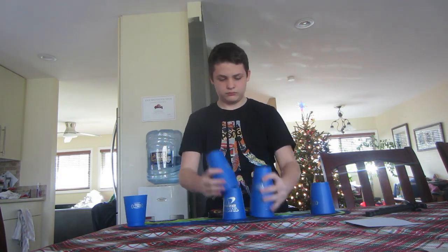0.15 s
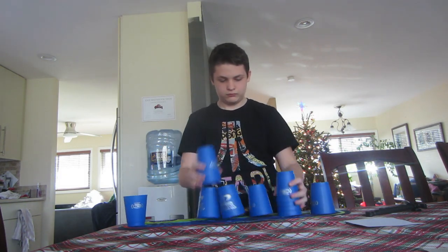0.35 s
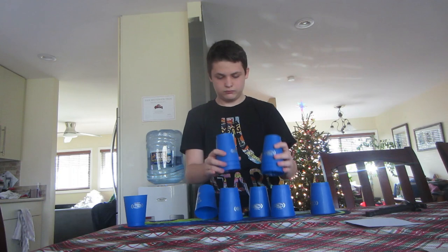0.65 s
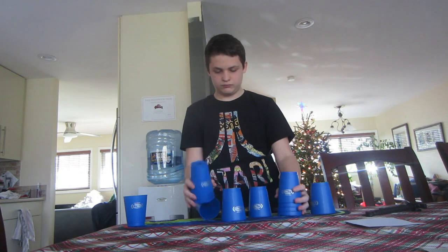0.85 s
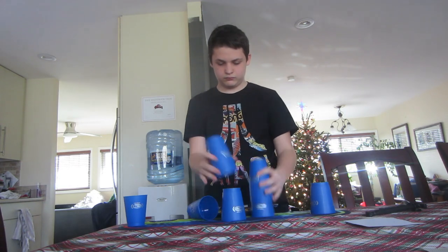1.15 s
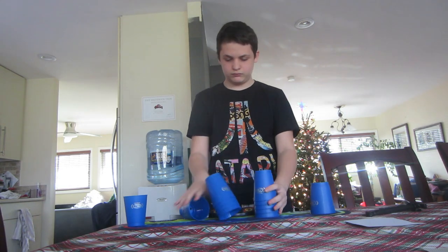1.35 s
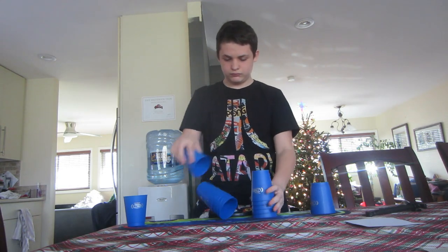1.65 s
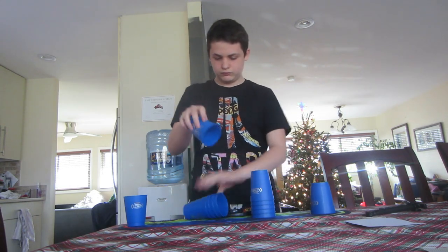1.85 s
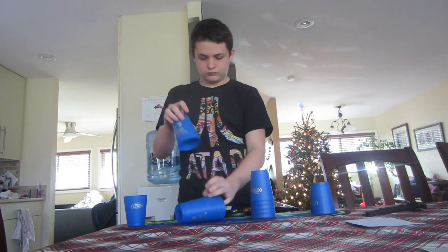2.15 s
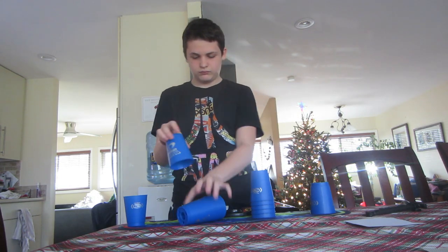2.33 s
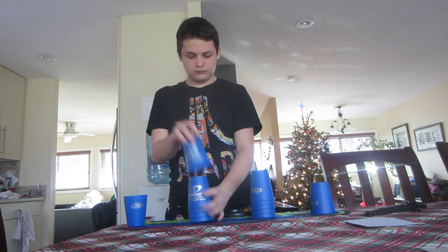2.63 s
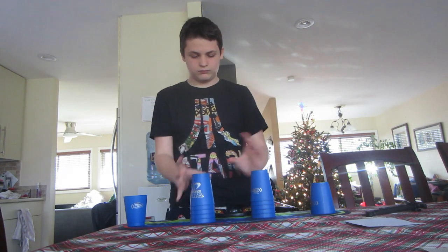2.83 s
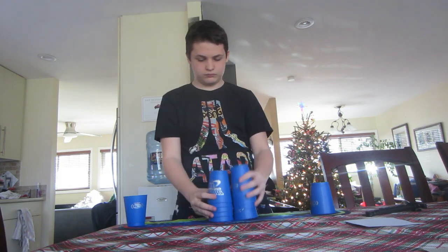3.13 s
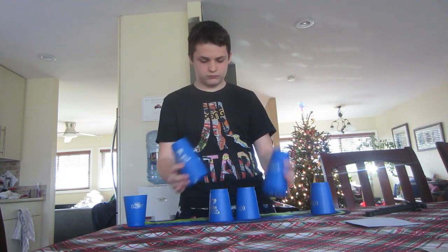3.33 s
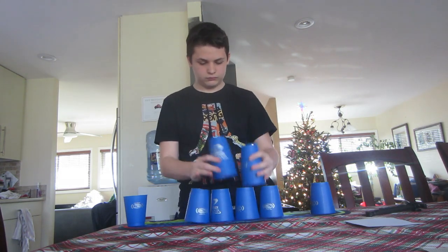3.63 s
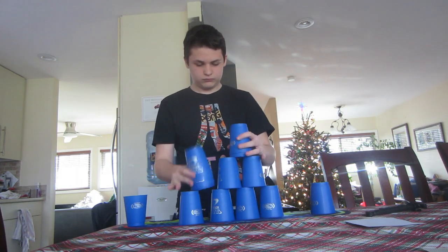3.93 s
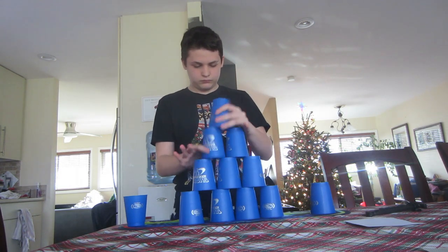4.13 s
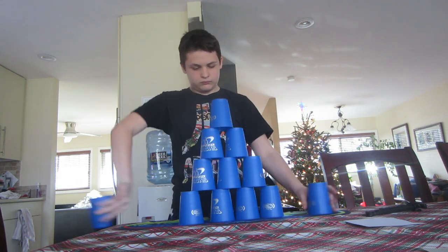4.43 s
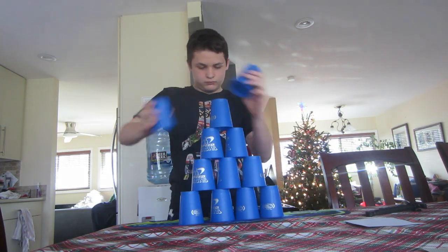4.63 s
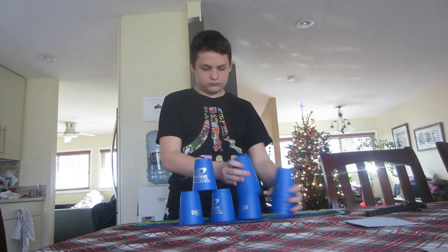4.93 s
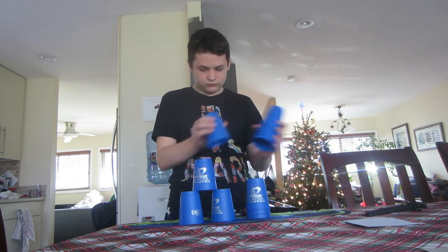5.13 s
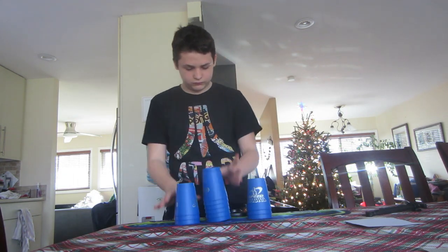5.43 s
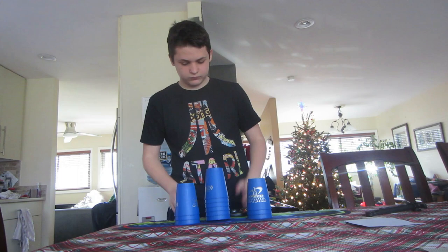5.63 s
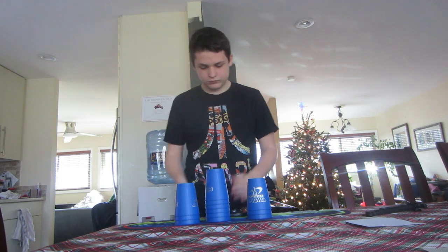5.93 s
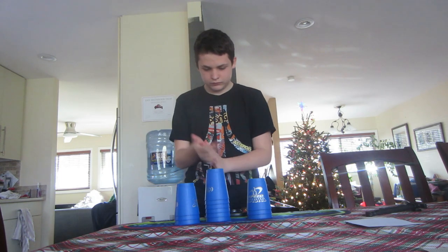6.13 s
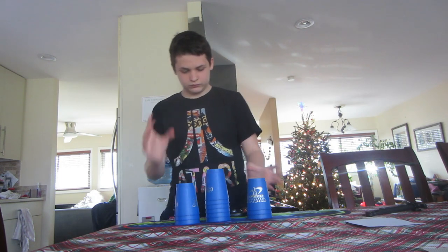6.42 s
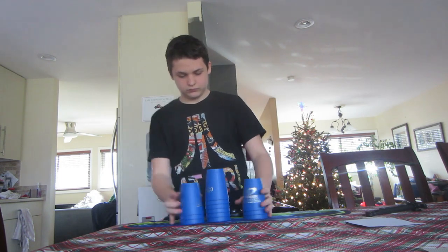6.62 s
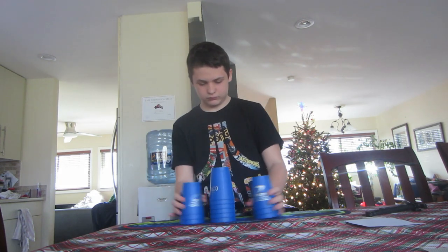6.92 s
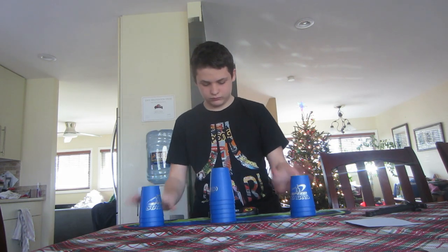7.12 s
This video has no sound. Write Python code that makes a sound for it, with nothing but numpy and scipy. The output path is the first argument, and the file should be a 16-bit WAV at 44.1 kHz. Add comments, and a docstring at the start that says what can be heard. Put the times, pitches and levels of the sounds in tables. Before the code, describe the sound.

Bright, dry plastic clacks with a hollow pop, irregular and fast, as cups nest and spread. A loud opening flurry thins to light taps, builds again through strong paired knocks, and ends in a rattling cascade. After a hushed gap, small taps and one firmer clack close it. Soft hand brushing, short room reverberation and a low steady hum surround everything.

```python
"""Hard plastic cups are stacked and unstacked fast on a mat on a table, in a lively room, one microphone.
Each knock is a click plus dying sines for the cup's wall, rim and trapped air, and a low thump of the table.
The room adds a few echoes and a tail of scattered taps that dies band by band.
Filtered noise makes the brushing of hands and cups and the room noise; wavering sines make a faint motor hum."""
import sys
import numpy as np
from scipy import signal
from scipy.fft import rfft, irfft
from scipy.io import wavfile
from scipy.ndimage import uniform_filter1d

SR = 44100
rng = np.random.default_rng(int(sys.argv[2]) if len(sys.argv) > 2 else 0)


def dump(signal):
    """Clip the signal to [-1, 1] and save it as 16-bit WAV at the path in sys.argv[1]."""
    limited = np.clip(np.atleast_2d(signal).T, -1, 1)
    pcm = np.round(limited * 32767).astype(np.int16)
    wavfile.write(sys.argv[1], SR, pcm)


N = 320594  # length in samples


def amp(db):
    """Turns decibels into a plain multiplier."""
    return 10 ** (np.asarray(db) / 20)


def evened(x):
    """Scales a signal to an average (RMS) strength of 1."""
    return x / np.sqrt(np.mean(x ** 2) + 1e-20)


def read(points, hz):
    """Reads a table of (pitch, value) at any pitch, with straight lines on a log pitch scale."""
    point_hz, value = np.transpose(points)
    return np.interp(np.log(hz + 1), np.log(point_hz + 1), value)


def add(mix, start_s, sound):
    """Adds a sound into the mix at a time, cut off where the mix ends."""
    part = mix[round(start_s * SR):][:len(sound)]
    part += sound[:len(part)]


def coloured(x, spectrum):
    """Filters by a spectrum given in dB."""
    gain = amp(read(spectrum, np.fft.rfftfreq(len(x), 1 / SR)))
    return irfft(rfft(x) * gain, len(x))


def waver(smoothed):
    """Turns smoothed noise into a level that drifts gently, by 0.77 dB RMS."""
    return amp(0.77 * evened(smoothed))


# Colour of the room noise before it is levelled: pitch_hz [Hz], level_db [dB per Hz]
AMBIENCE_COLOUR = [(20, 5.5), (60, -7), (140, -13), (180, -11), (230, -16.5), (390, -17), (540, -18.5),
                   (760, -21), (2700, -29.5), (3400, -35), (7000, -41.5), (11500, -69.5), (16000, -61.5)]
AMBIENCE_DB = -50.5  # RMS level
# Tones of the motor hum: pitch_hz [Hz], level_db [dB, peak before the waver]
HUM_TONES = [(60, -76.5), (176, -59.5), (240, -66), (468, -66.5), (540, -68)]


def background():
    """Steady room noise is filtered noise; the motor hum is a few sines that waver in level."""
    t = np.arange(N) / SR
    noise = amp(AMBIENCE_DB) * evened(coloured(rng.standard_normal(N), AMBIENCE_COLOUR))
    hum = np.zeros(N)
    for pitch_hz, level_db in HUM_TONES:
        slow = uniform_filter1d(uniform_filter1d(rng.standard_normal(N), 3000), 3000)
        hum += amp(level_db) * waver(slow) * np.sin(2 * np.pi * (pitch_hz * t + rng.random()))
    return noise + hum


# Hands on the cups, level over time: time_s [s], level_db [dB]
HAND_LEVEL = [(0, -72), (.85, -70), (1.2, -65.5), (1.7, -67), (2.3, -67.5), (2.5, -72), (2.7, -64.5),
              (3.02, -69), (3.3, -64), (4.25, -61), (4.5, -74), (5.3, -78), (5.7, -101), (6.1, -73),
              (6.68, -81), (6.74, -62.5), (7.27, -66)]
# Colour of the brushing before it is levelled: pitch_hz [Hz], level_db [dB per Hz]
BRUSH_COLOUR = [(200, -30), (700, -4), (2000, -2), (4000, -5), (7500, 0), (9500, -6), (11800, -28),
                (13200, -22), (16000, -30)]
# Cups sliding into or out of one another: start_s [s, full level reached], held_s [s], level_db [dB]
SLIDES = [(0.0, 0.029, -53.5), (.43, 0.081, -48), (.58, 0.027, -57), (3.14, 0.04, -58.5), (3.68, .01, -51),
          (3.89, .01, -63.5), (4.54, 0.022, -61.5), (5.03, 0.018, -57), (5.41, .01, -43.5),
          (6.88, 0.021, -58.5)]
SLIDE_RISE_DB_PER_S, SLIDE_FALL_DB_PER_S = 248, 195


def brushing():
    """Rubbing surfaces make soft grainy noise: hands throughout, and slides that swell, hold and die."""
    t = np.arange(N) / SR
    level = amp(np.interp(t, *np.transpose(HAND_LEVEL)))
    for start_s, held_s, level_db in SLIDES:
        rise_db = SLIDE_RISE_DB_PER_S * np.maximum(start_s - t, 0)
        fall_db = SLIDE_FALL_DB_PER_S * np.maximum(t - start_s - held_s, 0)
        level += amp(level_db - rise_db - fall_db)
    grain = waver(uniform_filter1d(rng.standard_normal(N), 250))
    return level * evened(coloured(rng.standard_normal(N), BRUSH_COLOUR) * grain)


PAIR_SPLIT = .015  # a cup is never quite round: each mode rings as a close pair, about this share apart


def ring(modes, t, rise_s, held_s, free_db, lean_db=0):
    """Dying sines, varied by the spot struck; contact damps most of the ring, the rest rings free; peak 1."""
    hz, level_db, t60_s = np.transpose(modes)[:, :, None]
    detune, luck, phase = rng.standard_normal((len(modes), 3)).T[:, :, None]
    spot_db, spot_detune = 2.5 * luck, .006 * detune
    damped = amp(lean_db + spot_db - 60 * t / held_s)  # falls 60 dB within held_s
    free = amp(free_db - 60 * t / t60_s)
    beat = np.cos(np.pi * PAIR_SPLIT * hz * (1 + luck / 3) * t) + .3
    sines = np.sin(2 * np.pi * hz * (1 + spot_detune) * t + 1.13 * phase)
    y = (amp(level_db) * (damped + free) * beat * sines).sum(0)
    y = y * (1 - np.exp(-t / rise_s)) ** 2  # soft start
    return y / abs(y).max()


def tick(scatter_s, size):
    """A click of even spectrum whose bands leave at scattered moments, as edges scrape into place."""
    luck = np.minimum(rng.exponential(1, size // 32 + 1), 3)
    late_s = np.repeat(luck ** 2 / 2 * scatter_s, 16)[:size // 2 + 1]  # 16 neighbours share a delay
    # Adding up the delays over pitch gives the phase that makes each band late
    spread = irfft(np.exp(-2j * np.pi * np.cumsum(late_s) * SR / size), size)
    return spread * (np.arange(size) < size // 4)


# The next three tables list ringing modes: pitch_hz [Hz], level_db [dB, relative],
# t60_s [s, time for the free ring to fall 60 dB]; each blow varies them a little
# The cup's wall
WALL_MODES = [(745, 0, .09), (828, 0, .1), (915, 0, .12), (1030, 0, .07), (1185, 0, .14), (1290, 0, .08),
              (1450, -2, .07), (1515, 0, .14), (1600, -2, .08), (1718, 0, .11)]
# Air under the upturned cup
AIR_MODES = [(370, -8, .03), (440, -1, .045), (495, 1, .04), (574, -1, .025), (650, -8, .02)]
# The cup's rim
RIM_MODES = [(2080, 0, .06), (2250, -1, .06), (2480, -1, .08), (2620, -6, .07), (2930, -11, .04),
             (3380, -13, .06)]
HELD_S = 0.014  # the hand and the contact damp most of a ring about this fast
AIR_SHIFT = .05  # the gap under the rim changes the pitch of the air by this share (RMS) from blow to blow


def distance(modes, favoured_hz):
    """How far each mode lies from the favoured pitch: 0 on it, 1 from 0.14 octave away."""
    octaves = abs(np.log2(np.array(modes)[:, :1] / favoured_hz))
    return np.minimum(octaves / .14, 1)


def knock(favoured_hz, others_db, air_db, rim_db, tick_db):
    """One blow: modes near the favoured pitch stand out (or recede) by others_db; air, rim and tick add in."""
    t = np.arange(8192) / SR
    lean_db = others_db * distance(WALL_MODES, favoured_hz)
    lift_db = -others_db * (1 - distance(RIM_MODES, favoured_hz))
    # A purer blow rings on more
    wall_held_s = HELD_S * (1 - others_db / 79.0)
    wall_free_db = -33 - .85 * others_db + 1.3 * lean_db
    wall = ring(WALL_MODES, t, 0.00082, wall_held_s, wall_free_db, lean_db)
    air_t = t * (1 + AIR_SHIFT * rng.standard_normal())  # faster time means higher pitch
    air = amp(air_db) * ring(AIR_MODES, air_t, 0.0011, 0.018, -22.0)
    rim = amp(rim_db) * ring(RIM_MODES, t, 0.00043, HELD_S, -27.0 + 1.4 * lift_db, lift_db)
    click = amp(tick_db + 13.0) * tick(0.0027, size=len(t))
    return wall + air + rim, click


# Cup on cup or mat: time_s [s], wall_db [dB, peak], favoured_hz [Hz, wall or rim mode],
# others_db [dB, the other modes], air_db [dB], rim_db [dB], tick_db [dB]; the last four relative to the wall
KNOCKS = [(0.069, -20, 828, -9.5, -7, -12.5, -21), (0.125, -20, 828, 1, -17, -16.5, -13),
          (0.156, -9, 857, -11, -39.5, -9, -9), (0.238, -22.5, 745, 9, 3.5, -5, -33),
          (0.243, -3, 800, -12.5, -5, -10.5, -9), (0.381, -9.5, 1030, -14, -6, -11, -11.5),
          (0.411, -16.5, 1030, -15.5, -27, -8, -22), (0.415, -8, 1555, -12, -29, -3, -21),
          (0.442, -20.5, 2480, -3.5, -25.5, 1.5, 3), (0.475, -16, 745, -2.5, 4, -16, -11),
          (0.478, -11.5, 1420, 4, -3, -7, -9), (0.598, -27.5, 1185, -8, -9.5, -6, -3.5),
          (0.851, -23.5, 990, -38, -4, -9, -1.5), (0.901, -18.5, 745, -19, -8, -8, -2),
          (0.926, -3.5, 1100, -1, -9, -11.5, -11.5), (1.003, -25, 915, -18.5, -6, -3.5, -0.5),
          (1.157, -48, 1290, 1.5, 3, 9, 8.5), (1.225, -41.5, 1030, -8, 5, -3.5, -7),
          (1.267, -39.5, 828, 5, 5, 4, 7.5), (1.304, -30.5, 745, -11, 12, -0.5, 8),
          (1.3291, -7, 745, 5, 2.5, -9, -9), (1.395, -3.5, 1456, -16, -25, -9.5, -13.5),
          (1.615, -16, 828, -7, -17, -8, -5), (1.87, -29.5, 828, -11, -4.5, 0.5, 4),
          (1.981, -35.5, 1450, -14, -1.5, 0, 2.5), (2.024, -28.5, 828, -21.5, -2.5, -12, -5),
          (2.035, -20.5, 1470, -7, -26, -8, -11.5), (2.131, -18.5, 1718, -11.5, -25, -7, -14),
          (2.22, -28, 915, -12, -10, -8.5, -22.5), (2.252, -21.5, 1515, -5.5, -16, -13.5, -24.5),
          (2.271, -26.5, 915, 4, -8.5, -12.5, -10.5), (2.382, -34.5, 915, -14, -7.5, -8.5, -13),
          (2.568, -38.5, 1535, -17.5, -4.5, -22, -0.5), (2.655, -29.5, 1515, 0, -11.5, -10.5, -23.5),
          (2.78, -6.5, 915, -9.5, -35, -10, -15), (2.8075, -3.5, 2200, -11, -34, -2, -8),
          (2.813, -10.5, 1515, -20, -27, -18, -12), (2.843, -10, 1030, -7, -6.5, -31, -5.5),
          (3.099, -30, 1600, 0, -11, -13, -30), (3.119, -28, 1185, -13, -2, -7.5, -15),
          (3.145, -28, 1290, -8, -2.5, -13, -17), (3.263, -37.5, 915, -22, 1, -8, 1),
          (3.293, -25, 1185, -15.5, 1, -3.5, -5), (3.428, -29.5, 1515, -5.5, -10.5, -9, -11),
          (3.474, -20, 1560, -7, -22, -6.5, -19), (3.486, -18, 915, -14.5, -25.5, -6.5, -10.5),
          (3.546, -8.5, 745, -14.5, -1.5, -12, -12.5), (3.607, -5.5, 745, -13, -11.5, -12.5, -8.5),
          (3.66, -20.5, 745, -5, -17.5, -3.5, -1.5), (3.724, -35.5, 915, -15, -14, -4.5, 2),
          (3.802, -2, 1718, -4, -8, -9, -16), (3.806, -13, 915, -23, -9.5, -17, -25),
          (3.826, -12.5, 915, -16, -28.5, -14, -10.5), (3.841, -5.5, 828, -7, -30, -10.5, -14),
          (3.993, -27.5, 828, -23, -1, -12, -20), (4.052, -0.5, 1187, -4.5, -23.5, -10.5, -13),
          (4.088, -5.5, 1030, -15.5, -2.5, -6.5, -12.5), (4.289, -9, 1052, -16.5, -10, -10, -7.5),
          (4.298, -5, 1220, -25.5, -8, -12, -29), (4.315, -33.5, 2250, -20, 4.5, 8, -23),
          (4.329, -23.5, 1185, -22, -16, -18, -31), (4.526, -32, 805, -16, -1, -23, -22),
          (4.867, -7, 915, -20.5, -11.5, -9.5, -6.5), (4.879, -8.5, 1194, -24.5, -6, -29, -17),
          (4.892, -18, 828, -32.5, -15, -12, -0.5), (4.92, -22.5, 1185, -4, -11, -7, 2.5),
          (4.926, -12, 915, -16.5, -11.5, -12, -4), (4.953, -18, 1290, -17, -12, -8, -2.5),
          (4.958, -3, 1240, -22.5, -10.5, -15, -9), (4.981, -7.5, 1185, 1.5, -21, -11.5, -11.5),
          (5.019, -5.5, 1620, -8, -15.5, -2.5, -12), (5.041, -14, 745, -2, 0, -14, -5),
          (5.06, -26, 1718, -15, -4, -5, -9.5), (5.086, -12.5, 1290, -13, -16, -6, -10),
          (5.149, -18.5, 925, -16.5, -20, -5.5, -9.5), (5.155, -21, 1718, -13, -18, 1, -11),
          (5.165, -20, 1718, -19, -21, -21, -23.5), (5.174, -22, 1718, -14, -16.5, -22, -20),
          (5.248, -29.5, 1718, -17, -19, -10, -25), (5.332, -5.5, 1185, -20, -1.5, -9, -9),
          (5.364, -6.5, 915, -16, -23, -17, -10.5), (5.387, -17, 1030, -12, -29, 2.5, 0),
          (5.436, -13, 1718, -7, -2.5, -22, -12), (5.442, -4.5, 1718, -9, -16, -9.5, -14.5),
          (5.849, -37.5, 828, -3, -6, -11, -20), (5.861, -44.5, 3380, -13, -10, 1, -7),
          (5.894, -49, 1030, -17, -6, -14, -20), (6.209, -40, 1600, 10, 1, 7, 12),
          (6.215, -39.5, 2620, -10, -3, 4.5, 2), (6.72, -32, 745, -8, -12, -12, -23),
          (6.771, -29.5, 828, 3, -3.5, -5, -1), (6.81, -54, 1030, -14, -5, 8, 6),
          (6.829, -23.5, 1030, -8, -2.5, -6, -11.5), (7.088, -37, 1290, -16, -4, -10, -6),
          (7.107, -22.5, 1576, -11, -29, -16, -14), (7.139, -22, 1600, -19, 1, -6, 0),
          (7.168, -6.5, 1637, -20.5, -17, -5.5, -12.5)]
# Loose cups chattering as a stack drops together: start_s [s], end_s [s], level_db [dB, middle of a spread]
CHATTER = [(.25, .285, -19), (4.885, 5.12, -25), (5.34, 5.43, -24)]
CHATTER_PER_S = 60  # knocks per second
# Colour shared by all ticks: pitch_hz [Hz], gain_db [dB]
TICK_COLOUR = [(80, -36), (400, -3), (1000, 10), (3000, 7), (4500, 2.5), (5500, 4), (8000, 0),
               (10000, -8.5), (11800, -27), (13200, -18.5), (16000, -29)]


def cups():
    """Every blow rings a cup and clicks; bodies and ticks are kept apart, and ticks share one colour."""
    body, ticks = np.zeros((2, N))
    loose = []
    for start_s, end_s, level_db in CHATTER:
        for u, v, w in rng.random((round(CHATTER_PER_S * (end_s - start_s)), 3)):
            time_s = start_s + (end_s - start_s) * u
            loose.append((time_s, level_db + 8 * (v - .5), 745 + 1500 * w, -8, -9, -5, -8))
    for time_s, wall_db, *blow in KNOCKS + loose:
        ringing, click = knock(*blow)
        start_s = time_s - .0006  # begins just ahead of the listed time
        add(body, start_s, amp(wall_db) * ringing)
        add(ticks, start_s, amp(wall_db) * click)
    return body, coloured(ticks, TICK_COLOUR)


# Modes of the table: pitch_hz [Hz], level_db [dB, relative], t60_s [s]; each thump varies them a little
TABLE_MODES = [(85, 1, 0.042), (109, -12, 0.22), (139, -2.5, 0.093), (207, -1, 0.0085),
               (273.6, -6.5, 0.056)]
# Cups, stacks or hands landing on the mat, felt through the table: time_s [s], level_db [dB, peak]
LANDINGS = [(0.069, -35), (0.382, -29), (0.476, -29.5), (0.925, -26), (1.003, -33.5), (1.222, -35),
            (1.327, -27), (1.398, -26), (1.87, -29), (1.98, -36), (2.033, -28.5), (2.568, -37.5),
            (2.78, -15.5), (2.844, -23.5), (3.12, -34.5), (3.547, -27), (3.606, -27.5), (3.659, -35),
            (4.524, -36.5), (5.042, -30), (5.085, -31.5), (5.149, -37.5), (5.437, -18), (6.829, -35),
            (7.139, -33)]
SHAKE_DB = -36.5  # every listed knock shakes the table a little, relative to the wall


def table():
    """Blows make the table ring low and briefly: dull thumps that reach the microphone through the wood."""
    out, t = np.zeros(N), np.arange(8192) / SR
    shakes = [(row[0], row[1] + SHAKE_DB) for row in KNOCKS]
    for time_s, level_db in LANDINGS + shakes:
        add(out, time_s, amp(level_db) * ring(TABLE_MODES, t, 0.0066, 0.027, -16.5))
    return out


# How long the room rings: pitch_hz [Hz], t60_s [s]
ROOM_T60 = [(100, 0.13), (300, 0.43), (700, 0.52), (1800, 0.53), (5000, 0.49), (12000, 0.36)]
# Echoes off near walls and table: delay_s [s, varied by up to a tenth], level_db [dB]
ECHOES = [(.004, -13), (.009, -14), (.014, -13), (.024, -13), (.031, -15)]


def room(x):
    """Early echoes, then sparse taps dying band by band; three tails take turns steadily, so it keeps changing."""
    out = np.zeros(N)
    turn = 2 * np.pi * 3.1 * np.arange(N) / SR  # 3.1 turns per second
    for k in range(3):
        taps = np.zeros(SR)
        # One tap at a random place in every 20 samples
        at = np.arange(260, SR - 20, 20) + rng.integers(0, 20, (SR - 261) // 20)
        taps[at] = rng.choice([-1., 1.], len(at))
        hz, t, bands = signal.stft(taps, SR, nperseg=256)
        decay = amp(-60 * t / read(ROOM_T60, hz)[:, None])
        tail = signal.istft(bands * decay, SR, nperseg=256)[1]
        tail = tail * (1 - np.exp(-np.arange(len(tail)) / SR / .007))  # the tail builds up
        tail = amp(-5.5) * tail / np.linalg.norm(tail)
        for delay_s, level_db in ECHOES:
            add(tail, delay_s * rng.uniform(.9, 1.1), amp([level_db]) * rng.choice([-1., 1.]))
        share = np.sqrt(2 / 3) * np.cos(turn + k * np.pi / 3)
        out += signal.fftconvolve(x * share, tail)[:N]
    return out


TICK_ROOM_DB, THUMP_ROOM_DB = 0.5, -1.0  # what ticks and thumps feed the room, relative to their direct sound


def scene():
    """Direct sounds, their room sound, brushing and background, the same in both channels."""
    body, ticks = cups()
    thumps = table()
    direct = body + ticks + thumps
    echoed = room(body + amp(TICK_ROOM_DB) * ticks + amp(THUMP_ROOM_DB) * thumps)
    mono = direct + echoed + brushing() + background()
    return np.array([mono, mono])


EDGE_HZ = 16300  # upper band limit


def record(dry):
    """The microphone drops the deepest bass; the loudest knocks bend against full scale; then the band limit."""
    thin = signal.lfilter(*signal.butter(2, 60., "high", fs=SR), dry)
    bent = thin / (1 + abs(thin) ** 8) ** (1 / 8)
    lowpass = signal.firwin(511, EDGE_HZ, window=("kaiser", 9), fs=SR)
    return signal.oaconvolve(bent, lowpass[None], "same")


dry = scene()
out = record(dry)
dump(out)
```